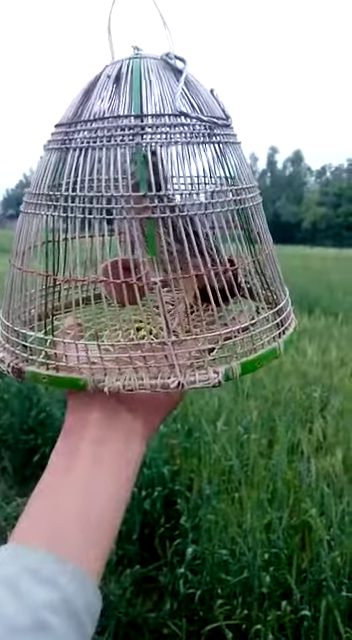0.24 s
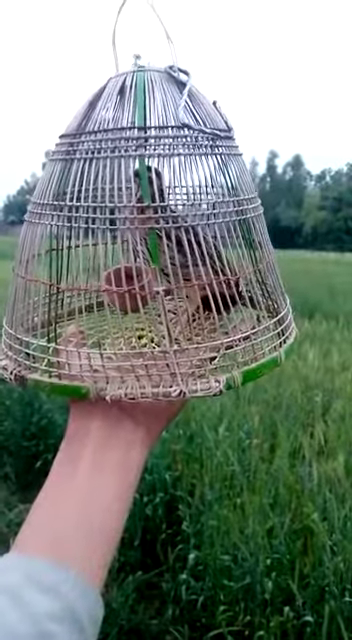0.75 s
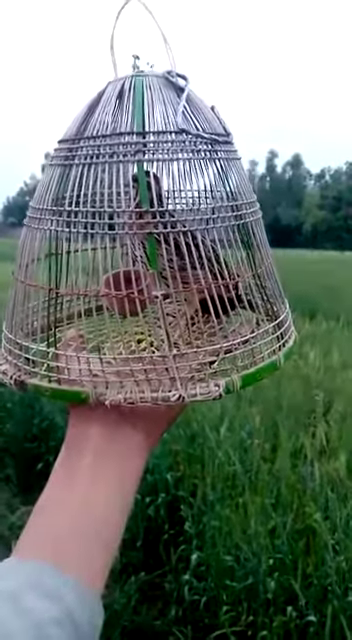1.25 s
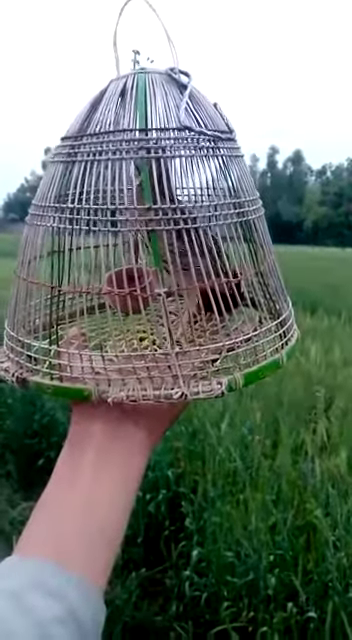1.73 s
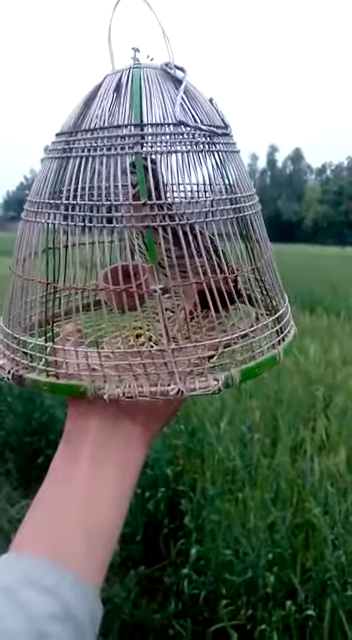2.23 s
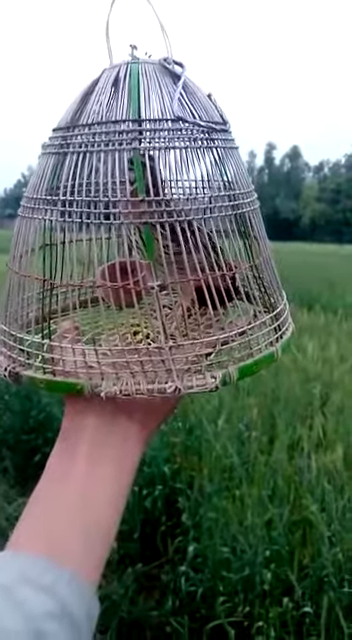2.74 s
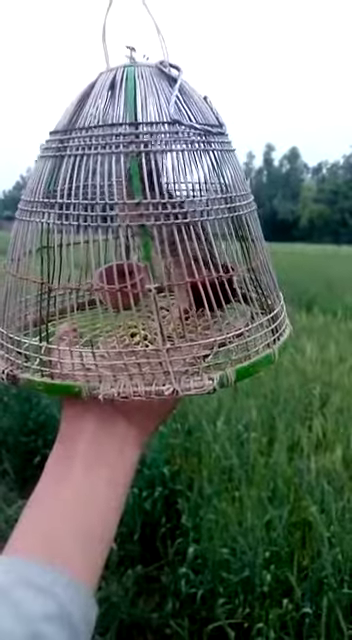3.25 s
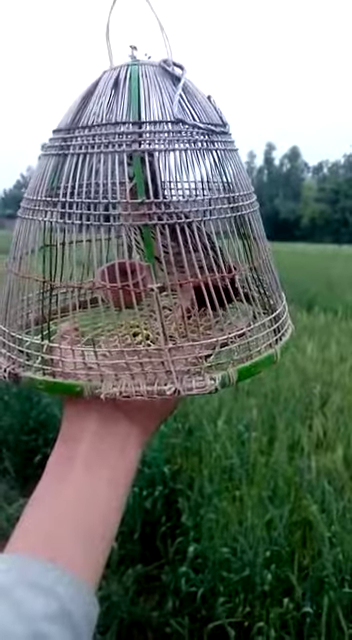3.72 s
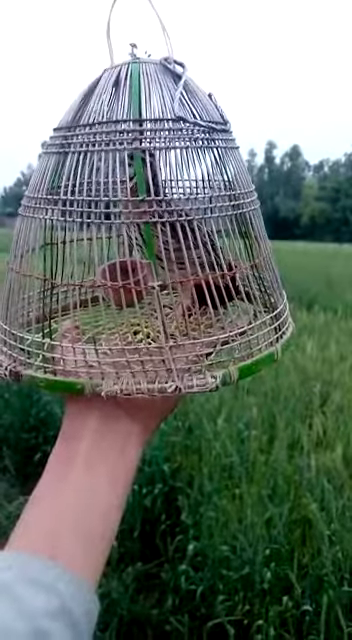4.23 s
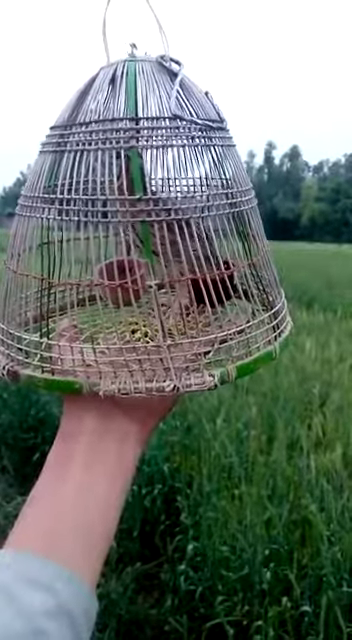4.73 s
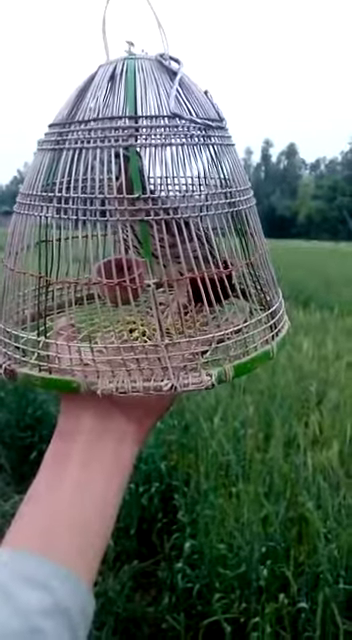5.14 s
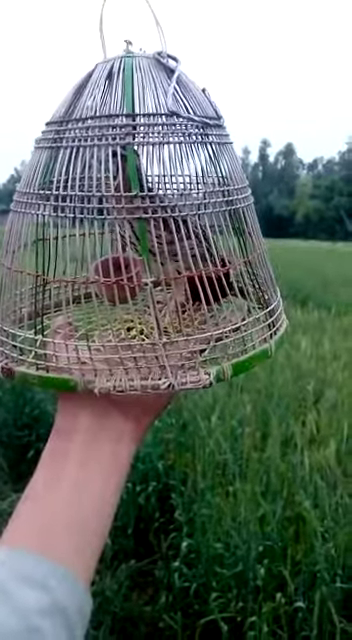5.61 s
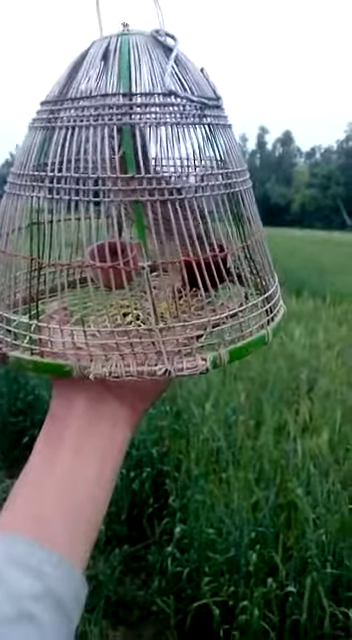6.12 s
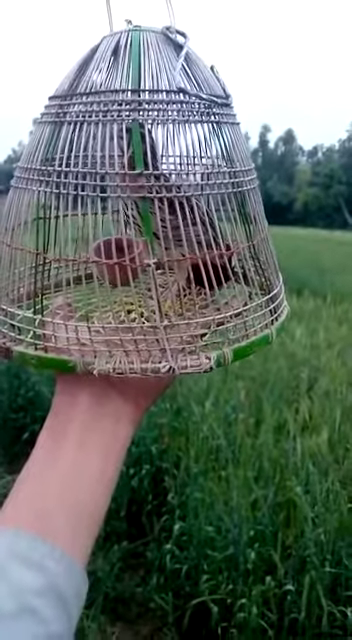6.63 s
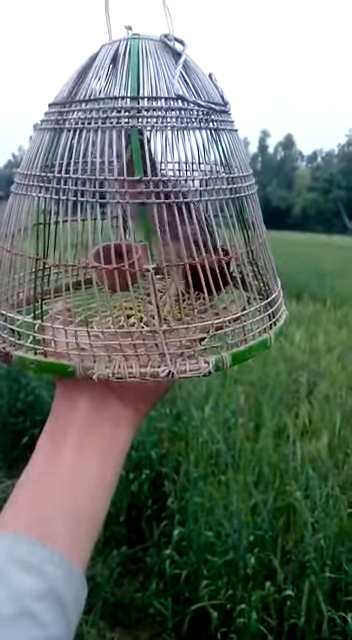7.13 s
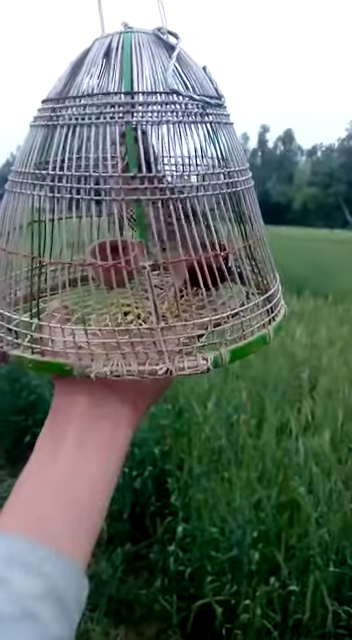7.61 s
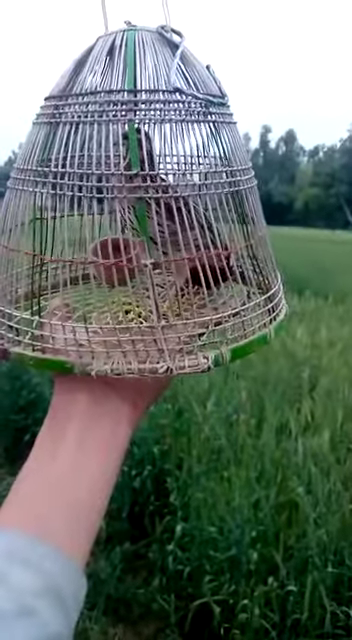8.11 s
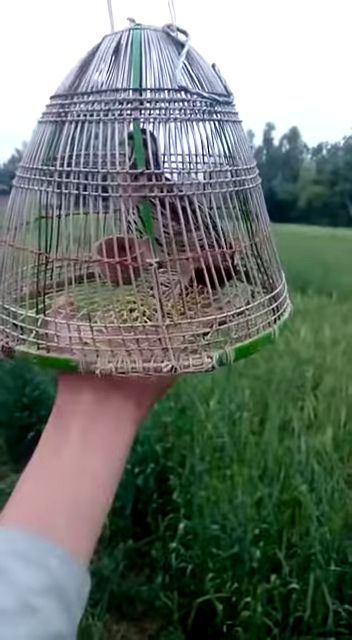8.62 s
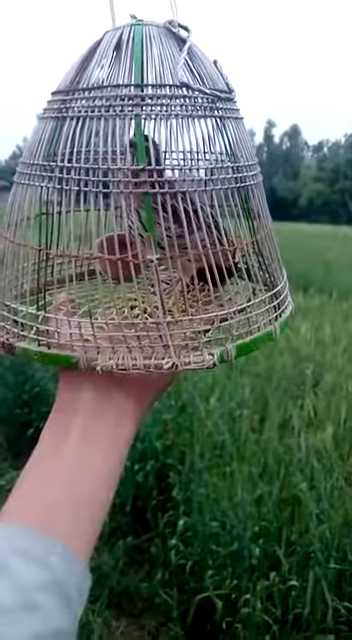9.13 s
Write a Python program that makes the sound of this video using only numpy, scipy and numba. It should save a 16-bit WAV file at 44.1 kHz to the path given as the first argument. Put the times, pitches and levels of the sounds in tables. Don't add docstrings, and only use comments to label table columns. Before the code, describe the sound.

A quail in a wire cage held close to a phone microphone gives six loud pairs of thin, near-pure whistles, each note whipping sharply upward. Scattered echoes return from crops and distant trees. Underneath are low wind puffs, leafy murmur and a faint motor hum. A crow caws once far away near seven seconds, then tiny whistles, buzzy chirps and a distant flock swell toward the end.

```python
import sys
import numpy as np
from scipy import signal
from scipy.fft import rfft, irfft
from scipy.io import wavfile
from scipy.ndimage import uniform_filter1d
from numba import njit

SR = 44100
rng = np.random.default_rng(int(sys.argv[2]) if len(sys.argv) > 2 else 0)


def dump(signal):
    limited = np.clip(np.atleast_2d(signal).T, -1, 1)
    pcm = np.round(limited * 32767).astype(np.int16)
    wavfile.write(sys.argv[1], SR, pcm)


def voltage_ratio(decibels):
    exponent = np.asarray(decibels, float) / 20
    return 10 ** exponent


N = 412776
T = np.arange(N) / SR


def unit(x):
    return x / np.sqrt(np.mean(x ** 2))


def add(track, x, s):
    i = int(s * SR)
    track[i:i + len(x)] += x[:N - i]


def curve(points, x):
    return np.interp(x, *np.transpose(points))


def lowpass(x, hz, order=2):
    return signal.sosfiltfilt(signal.butter(order, hz, fs=SR, output="sos"), x)


def walk(rate):
    hold = int(SR / rate)
    steps = np.repeat(rng.standard_normal(N // hold + 1), hold)
    return 1.3 * uniform_filter1d(uniform_filter1d(steps, hold), hold)[:N]


def bumps(rows):
    return sum(db * np.exp(-((T - s) / half) ** 2) for s, half, db in rows)


def blur(x, wet):
    tail = wet * rng.standard_normal(6000) * np.exp(-np.arange(6000) / SR / .035)
    tail[0] = 1
    return signal.fftconvolve(x, tail)[:N]


FIRST = dict(start_ms=-90, rest_hz=3337, climb_hz=1100, climb_ms=13.1, scoop_hz=458, flick_hz=450,
             swell_db=-6, swell_ms=45, peak_db=3.2, squeak_db=-46, attack_ms=5)
SECOND = dict(start_ms=-62, rest_hz=3198, climb_hz=1310, climb_ms=15.2, scoop_hz=1.5, flick_hz=1100,
              swell_db=-16, swell_ms=31, peak_db=1.5, squeak_db=-70, attack_ms=5.5)
SCOOP_MS, FLICK_MS = 22.6, 1.4
SQUEAK_MS, SQUEAK_HZ, SQUEAK_SAG_HZ = 10, 6050, 45
CATCH_DB, CATCH_HZ = -7, 56
WHIP_DB, FAILED_WHIP_DB = -6.5, -20
BREAK_MS, BREAK_HZ = -2.5, 250
WHIP_END_MS, WHIP_RISE_HZ, WHIP_TOP_HZ = 7.8, 230, 6800
TOP_MS, TOP_HZ, TOP_REACH_HZ, TOP_SAG_HZ = 5.5, 7680, 1100, 17
TOP_DB, TOP_FADE_DB = -13.5, -1.14
# multiple of the pitch, level in dB.
OVERTONES = [(2, -34.5), (3, -44.5), (4, -51)]


def syrinx(kind, factor, catch_hz, early_ms, whip_db):
    t = np.arange(-108, 35, 1000 / SR)
    start = kind["start_ms"] - early_ms
    age = np.maximum(t - start, 0)

    climb = kind["climb_hz"] * np.exp(np.minimum(t, BREAK_MS) / kind["climb_ms"])
    scoop = kind["scoop_hz"] * np.exp(-(age / SCOOP_MS) ** 2)
    flick = kind["flick_hz"] * np.exp(-age / FLICK_MS)
    body_hz = factor * (kind["rest_hz"] + climb + scoop + flick)
    swell = kind["swell_db"] * np.clip(1 - age / kind["swell_ms"], 0, 1)
    catch = CATCH_DB * np.exp(-((body_hz - catch_hz) / CATCH_HZ) ** 2) * (t > -40)
    body_db = kind["peak_db"] + swell + catch + whip_db * (t > BREAK_MS)
    past_break = t - BREAK_MS
    body_hz = body_hz + WHIP_RISE_HZ * np.maximum(past_break, 0) + BREAK_HZ * np.clip(past_break, 0, 1)
    body_hz = np.minimum(body_hz, WHIP_TOP_HZ)
    body_fade = np.clip((WHIP_END_MS - t) / 3, 0, 1)
    body_size = voltage_ratio(body_db) * np.clip(age / kind["attack_ms"], 0, 1) * body_fade

    early = t - start + SQUEAK_MS
    squeak_hz = SQUEAK_HZ - SQUEAK_SAG_HZ * early
    squeak_size = voltage_ratio(kind["squeak_db"]) * np.clip(early / 4, 0, 1) * (age == 0)

    late = np.maximum(t - TOP_MS, 0)
    top_hz = TOP_HZ - TOP_REACH_HZ * np.exp(-late / 2) - TOP_SAG_HZ * late
    top_size = voltage_ratio(TOP_DB + TOP_FADE_DB * late) * np.clip(late / 2, 0, 1) * np.clip((30 - t) / 8, 0, 1)

    out = 0
    for hz, size in [(squeak_hz, squeak_size), (body_hz, body_size), (top_hz, top_size)]:
        phase = 2 * np.pi * np.cumsum(hz) / SR
        tone = np.sin(phase)
        for k, db in OVERTONES:
            below_limit = np.clip((17000 - k * hz) / 1000, 0, 1)
            tone = tone + voltage_ratio(db) * np.sin(k * phase) * below_limit
        out = out + tone * uniform_filter1d(size, 50)
    return out


NEAR_DB, NEAR_DB_PER_S, NEAR_RISE_S = -34.5, -400, 0.005
FAR_DB, FAR_DB_PER_S, REACH_S = -65, -19.5, 1.6
# delay in seconds, level in dB.
ECHOES = [(.0307, -48.5), (0.041, -51.5), (0.0617, -53.5), (.0864, -58), (0.1274, -53.5), (.1367, -38),
          (0.1559, -44.5), (.1871, -38), (0.2005, -43.5), (0.217, -45.5), (0.237, -52), (0.2949, -47.5),
          (0.3145, -51.5), (0.3401, -55), (0.3613, -61), (.3773, -59), (0.4561, -52.5), (.4697, -41.5),
          (0.488, -48), (0.617, -55.5), (0.6323, -52.5), (0.653, -60), (0.772, -57), (.7908, -60),
          (0.8897, -81), (.9233, -70.5), (1.076, -66), (1.23, -68.5)]
# lower edge in Hz, extra loss in dB per second of travel.
AIR_LOSS = [(4700, -14), (6100, -28)]


def landscape(scatter_db, echo_db_per_s):
    t = np.arange(int(REACH_S * SR)) / SR
    noise = rng.standard_normal(len(t))
    near = voltage_ratio(NEAR_DB + NEAR_DB_PER_S * t) * (1 - np.exp(-(t / NEAR_RISE_S) ** 2))
    far = voltage_ratio(FAR_DB + scatter_db + FAR_DB_PER_S * t)
    h = np.hypot(near, far) * noise / np.sqrt(SR / 1000)
    for s, db in ECHOES:
        db = db + echo_db_per_s * s
        h[int(s * SR)] += voltage_ratio(db - 5 * s)
        leaves = np.exp(-abs(t - s) / (.001 + .004 * s))
        h += .08 * voltage_ratio(db) * noise * leaves
    for hz, db_per_s in AIR_LOSS:
        low = lowpass(h, hz)
        h = low + (h - low) * voltage_ratio(db_per_s * t)
    return h


FIRST_PAIR_SCATTER_DB, FIRST_PAIR_ECHO_DB_PER_S = 6, -14
# whip in seconds, pitch factor, level in dB, catch in Hz, early start in ms.
NOTES = [(.1996, 0.99, -6.5, 3591, 0.5), (.4535, .99, -2.5, 3530, 0.24), (1.5911, 0.99, -6, 3540, -0.17),
         (1.8435, 1, -3, 3500, 1.4), (2.9898, 1, -6, 3526, 1.73), (3.2409, 0.99, -3.5, 3498, 0),
         (4.3866, 1, -6.5, 3524, 0.05), (4.6399, 1.002, -2.5, 3528, 0.63), (5.8103, 1.0045, -6, 3526, 0.5),
         (6.0639, 1, -4, 3530, 2.5), (7.249, 1, -7, 3530, 1.5), (7.5019, 1, -4, 3510, 1.76)]
# frequency in Hz, level in dB.
GROUND = [(3900, -11), (5000, -4)]
# comb spacing in Hz, level in dB.
CAGE = [(782, -24.5), (632, -23.5), (70., -23.5)]
# frequency in Hz, gain in dB.
CALL_COLOUR = [(7800, 2.5), (8800, -10.5), (10200, -7), (11600, 4.5), (13300, -9.5), (15000, 7.5), (15900, 7)]
# frequency in Hz, gain in dB.
FIELD_LIFT = [(3400, 0), (4150, -5), (4700, 3.5), (5900, 3.5), (6600, 1)]


def quail():
    out = np.zeros(N)
    for i, (s, factor, db, notch_hz, early_ms) in enumerate(NOTES):
        kind = (FIRST, SECOND)[i % 2]
        whip_db = WHIP_DB + FAILED_WHIP_DB * (i == 7)
        note = np.pad(syrinx(kind, factor, notch_hz, early_ms, whip_db) * voltage_ratio(db), (0, 2048))
        spectrum = rfft(note)
        f = np.fft.rfftfreq(len(note), 1 / SR)
        paths = 1 + voltage_ratio(curve(GROUND, f)) * np.exp(-21j * np.pi * f / notch_hz)
        for hz, bounce_db in CAGE:
            paths = paths + voltage_ratio(bounce_db) * np.exp(-2j * np.pi * f / hz)
        start = s - .108
        add(out, irfft(spectrum * paths * voltage_ratio(curve(CALL_COLOUR, f)), len(note)), start)
        first_pair = i < 2
        field = landscape(FIRST_PAIR_SCATTER_DB * first_pair, FIRST_PAIR_ECHO_DB_PER_S * first_pair)
        sent = irfft(spectrum * voltage_ratio(curve(FIELD_LIFT, f)), len(note))
        add(out, signal.fftconvolve(sent, field), start)
    return out


def chirps(table, trill_hz, rough, wet, early):
    out = np.zeros(N)
    for s, length, hz0, hz2, db in table:
        n = int(length * SR)
        u = np.arange(n) / n
        hz = np.interp(u, [0, .4, 1], [hz0, hz0 + early * (hz2 - hz0), hz2])
        hz = uniform_filter1d(hz, n // 4, mode="nearest")
        hz = hz * (1 + rough * np.sin(2 * np.pi * trill_hz * u * length))
        grit = 1 + 60 * rough * uniform_filter1d(uniform_filter1d(rng.standard_normal(n), 24), 24)
        arch = np.sqrt(np.sin(np.pi * u))
        add(out, voltage_ratio(db) * arch * grit * np.sin(2 * np.pi * np.cumsum(hz) / SR), s)
    return blur(out, wet)


CHATTER_DB, FLOCK_DB = -80, 13
FLOCK_S = 8.75, .6


def chatter(count):
    when, length, pitch, glide, size = rng.random((count, 5)).T
    s = when * T[-1]
    hz = 2300 * voltage_ratio(7.5 * pitch)
    flock = np.interp(s, T, bumps([(*FLOCK_S, FLOCK_DB)]))
    db = CHATTER_DB + flock - 9 * size - 5 * pitch
    rows = zip(s, .03 + .07 * length, hz * (.85 + .3 * glide), hz * (1.06 - .12 * glide), db)
    return chirps(rows, trill_hz=90, rough=.02, wet=.03, early=.7)


# start in seconds, length in seconds, start pitch in Hz, end pitch in Hz, level in dB.
WHISTLES = [(7.99, 0.071, 2950, 2410, -72), (8.07, .06, 2050, 1960, -69), (8.15, 0.03, 2715, 2580, -64),
            (8.26, 0.085, 3600, 3950, -63), (8.42, .08, 3500, 3950, -66), (8.05, .06, 4200, 4266, -68),
            (.195, .045, 1700, 1660, -67), (8.42, 0.066, 2600, 2276, -68), (8.51, .07, 2050, 1900, -69),
            (8.595, .055, 2430, 2380, -73.5), (8.7, .055, 2425, 2400, -65.5),
            (8.715, .105, 3300, 3900, -61), (8.88, .05, 3370, 3870, -66), (8.94, .07, 2740, 2397, -67),
            (8.99, .06, 1970, 1870, -67), (9.08, .05, 2500, 2400, -71), (9.17, 0.043, 1896, 1870, -73.5),
            (9.3, 0.066, 2756, 2450, -73), (5.445, .055, 2980, 2950, -71), (5.51, .05, 2400, 2330, -74.5)]
# start in seconds, length in seconds, start pitch in Hz, end pitch in Hz, level in dB.
BUZZES = [(2.74, .15, 4500, 4000, -71), (4.14, .1, 5500, 4200, -73), (5.635, .08, 5300, 4500, -66),
          (7.885, .17, 7000, 5700, -65), (8.36, .14, 3400, 3900, -71), (8.4, .12, 2600, 2300, -76),
          (8.57, .22, 6100, 5800, -80), (8.73, .08, 7200, 7700, -83), (8.81, .14, 5200, 4400, -68),
          (8.89, .14, 2500, 2300, -77), (8.97, .1, 5400, 4100, -67), (9.25, .11, 7000, 5800, -79)]


def songbirds():
    whistles = chirps(WHISTLES, trill_hz=60, rough=.008, wet=.03, early=.75) * voltage_ratio(1.2)
    buzzes = chirps(BUZZES, trill_hz=130, rough=.045, wet=.022, early=.52)
    return whistles + buzzes + chatter(count=260)


# time in seconds, pitch in Hz, level in dB.
CAW = [
    (6.859, 519.4, -74),
    (6.9, 527, -68),
    (7.0, 526, -63),
    (7.06, 521, -67.5),
    (7.13, 502, -66.5),
    (7.19, 473, -69.5),
    (7.22, 476, -96),
]
# multiple of the pitch, level in dB.
CAW_PARTIALS = [(2, -5), (3, 4), (4, -2), (5, -19)]


def crow():
    s, hz, db = np.transpose(CAW)
    phase = 2 * np.pi * np.cumsum(np.interp(T, s, hz) * (1 + .075 * walk(400))) / SR
    rattle = 1 + .7 * np.sin(2 * np.pi * np.cumsum(83 * (1 + .1 * walk(60))) / SR)
    voice = sum(voltage_ratio(d + 4 * walk(160)) * np.sin(k * phase) for k, d in CAW_PARTIALS)
    level = voltage_ratio(np.interp(T, s, db, -200, -200) - 5.5)
    return blur(level * rattle * voice, wet=0.063)


# frequency in Hz, width in Hz, level in dB.
PUMP = [(77.5, 10, -78.5), (150, 12, -81), (239, 20, -78.5), (348, 10, -83)]


def pump():
    out = 0
    for hz, width, db in PUMP:
        hum = signal.lfilter(*signal.iirpeak(hz, hz / width, SR), rng.standard_normal(N))
        out = out + voltage_ratio(db + .8 * walk(0.82)) * unit(hum)
    return out


def hiss(spectrum, flicker_db, rate):
    hz, db = np.transpose(spectrum)
    octave = np.log2(np.fft.rfftfreq(N, 1 / SR) + 1)
    coloured = rfft(rng.standard_normal(N)) * voltage_ratio(np.interp(octave, np.log2(hz), db, -99, -99))
    out = 0
    for centre in np.arange(4, 14.5, .5):
        band = irfft(coloured * np.clip(1 - 2 * abs(octave - centre), 0, 1), N)
        out = out + voltage_ratio(flicker_db * walk(rate)) * band
    return unit(out)


# frequency in Hz, level in dB per Hz.
FIELD = [(88, -27), (150, 1), (275, -7.5), (321, 1), (466, -6), (675, -4.5), (837, -12), (1500, -11),
         (2400, -16), (2980, -13.5), (3620, -8), (7180, -29), (13200, -40.5), (15100, -33.5), (16000, -37)]
# time in seconds, strength in dB.
BREEZE = [(0, 1), (.7, 0), (1.1, 6.5), (1.35, 3), (2.7, 0.7), (3.6, -0.5), (4.9, -2.5), (6.3, 0.2), (7, -3),
          (7.85, -0.7), (8.6, 2.5), (9.36, -0.2)]
MURMUR_EDGES_HZ = [800, 2050, 3000]
# level in dB, share of the breeze, own wander in dB.
MURMUR_LAYERS = [
    (-71.5, .8, 1.1),
    (-72, 1.1, .8),
    (-86, 1.8, 3),
]


def murmur():
    left = hiss(FIELD, flicker_db=3.5, rate=8)
    breeze = curve(BREEZE, T)
    out = 0
    for hz, (db, share, wander_db) in zip(MURMUR_EDGES_HZ, MURMUR_LAYERS):
        layer = lowpass(left, hz, order=4)
        out = out + unit(layer) * voltage_ratio(db + share * breeze + wander_db * walk(2.5))
        left = left - layer
    return out + left * voltage_ratio(-71)


WIND_DB, WIND_WANDER_DB = -67, 2
# frequency in Hz, level in dB per Hz.
GUST = [(25, -31), (42, -6), (75, 1.5), (156, -8.5), (188, -15.5), (236, -10.5), (274, -19), (450, -26.5),
        (580, -51), (990, -120)]
# middle in seconds, half length in seconds, dB over the wind.
PUFFS = [(.65, .1, -8.5), (.86, .04, -9), (1.2, .025, -13), (2.01, .03, 10), (3.02, .03, 16.5),
         (3.11, .045, 14.5), (3.3, .035, 18.5), (6.4, 1.2, -3), (.35, .2, 2.5), (3.51, .04, 7),
         (3.6, .03, -19), (3.9, .04, -15), (4.02, .07, 11), (4.47, .06, 10.5), (4.72, .08, 10),
         (7.45, .15, -5.5), (6.78, .1, -7), (8.08, .04, 6), (8.3, .15, -27), (8.93, .03, -13),
         (9.02, .04, -1), (9.18, .05, -10)]


def wind():
    return hiss(GUST, flicker_db=1.6, rate=12) * voltage_ratio(WIND_DB + bumps(PUFFS) + WIND_WANDER_DB * walk(20))


def scene():
    return (quail() * voltage_ratio(2.0) + songbirds() + crow() + pump() + murmur() + wind())[None]


@njit
def follow(x, attack, release):
    out, e = np.empty(len(x)), 0.
    for i in range(len(x)):
        e += (x[i] - e) * (attack if x[i] > e else release)
        out[i] = e
    return out


def roll_off(x):
    return signal.sosfilt(signal.butter(12, 17140, fs=SR, output="sos"), x)


def record(dry):
    attack_s, release_s, knee_db, squeeze = .006, .013, -34, .36
    envelope = follow(abs(dry[0]), 1 / (attack_s * SR), 1 / (release_s * SR))
    gain = uniform_filter1d(np.maximum(envelope / voltage_ratio(knee_db), 1) ** -squeeze, 200)
    held = np.interp(T - (T - .007) % .02, T, gain)
    gain = gain + .016 * (held - gain)
    bass = lowpass(dry, 220)
    mix = (dry - bass + bass * gain ** 0.53) * gain
    return roll_off(mix)


dry = scene()
out = record(dry)
dump(out)
```